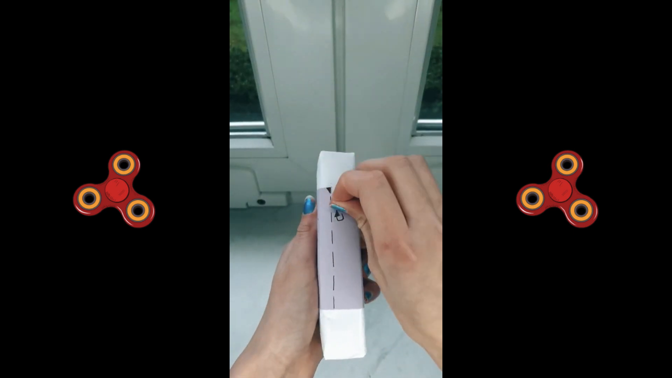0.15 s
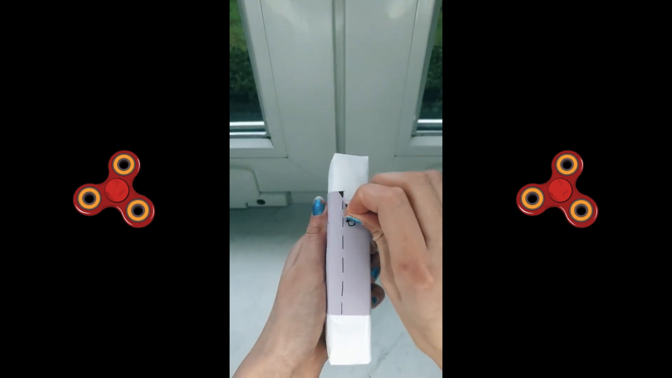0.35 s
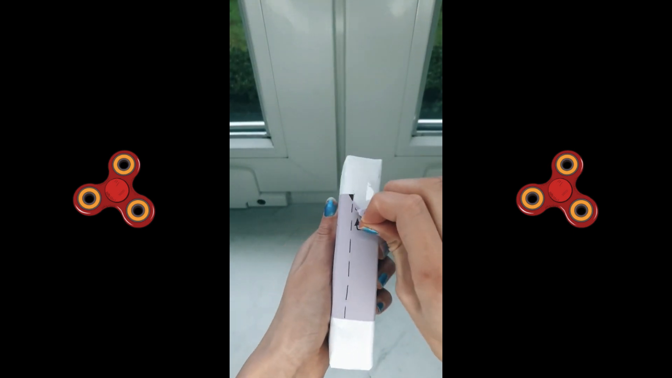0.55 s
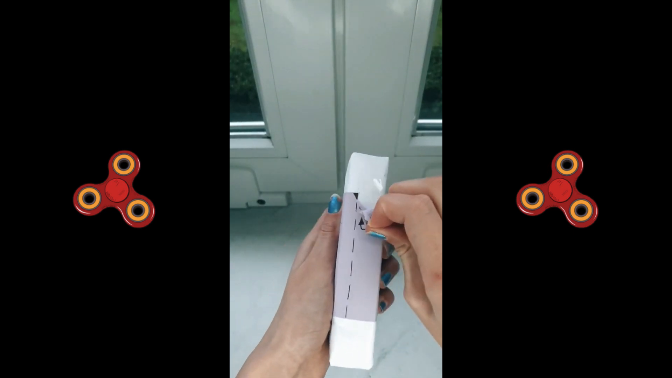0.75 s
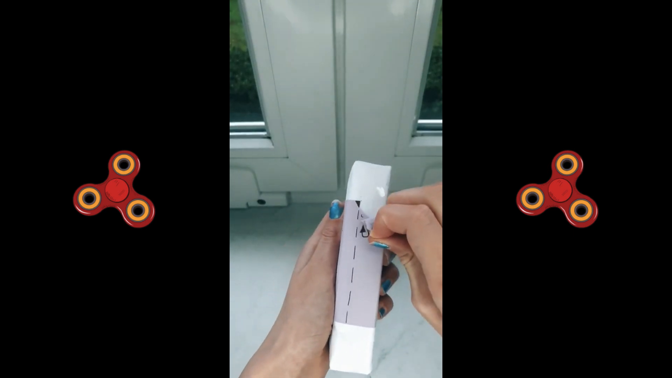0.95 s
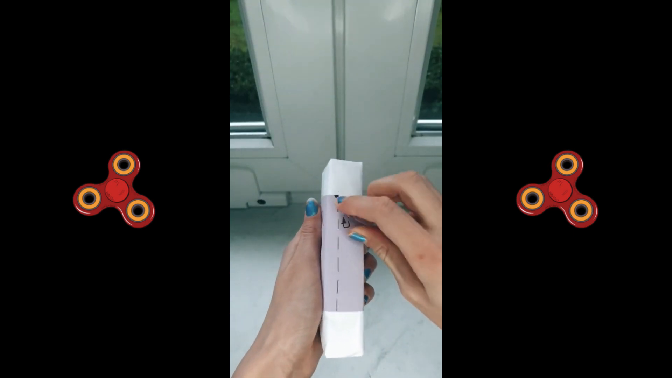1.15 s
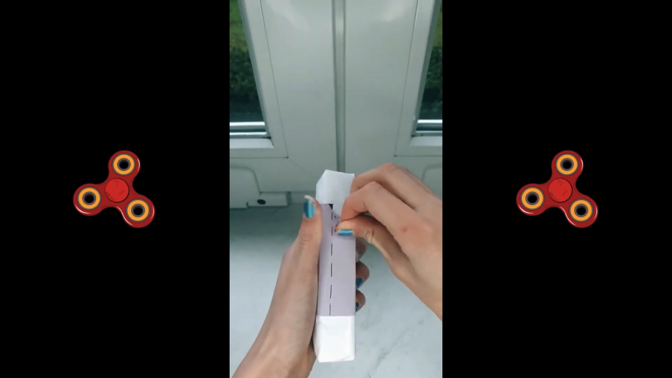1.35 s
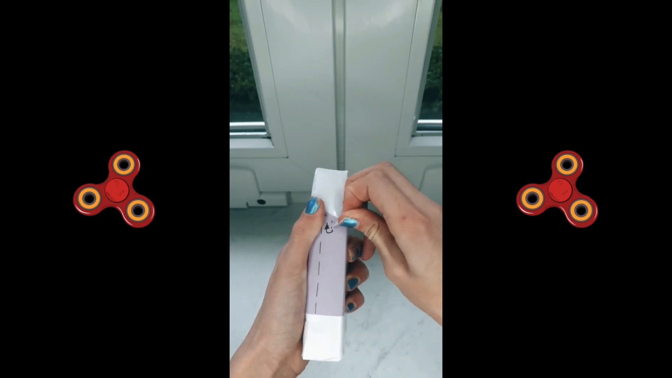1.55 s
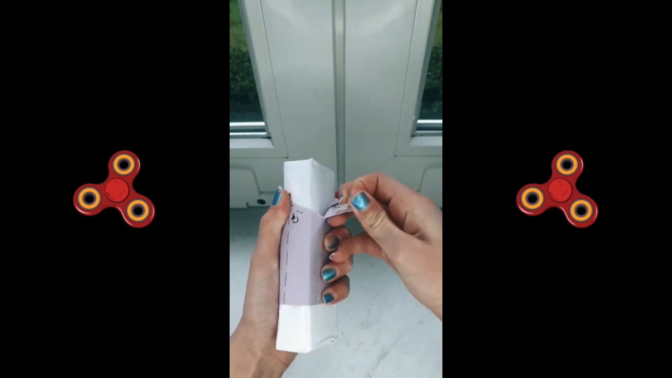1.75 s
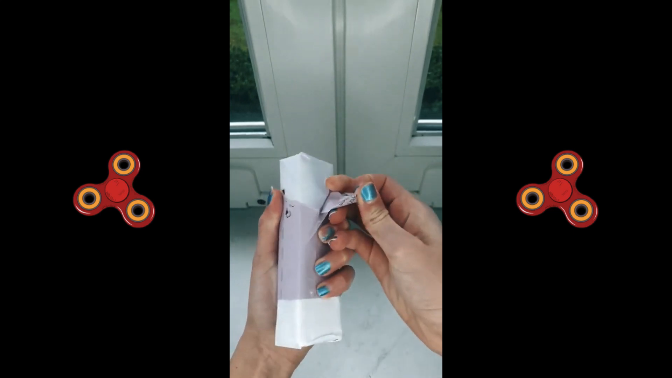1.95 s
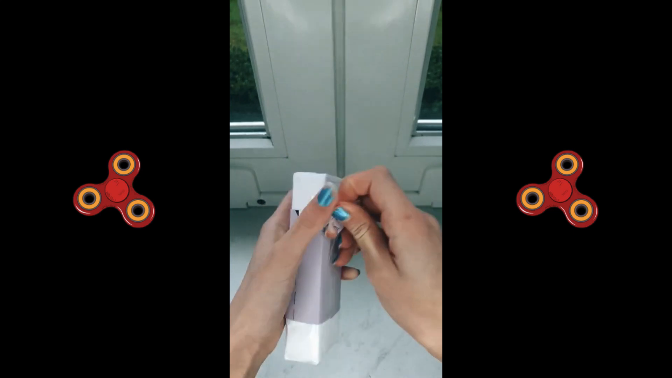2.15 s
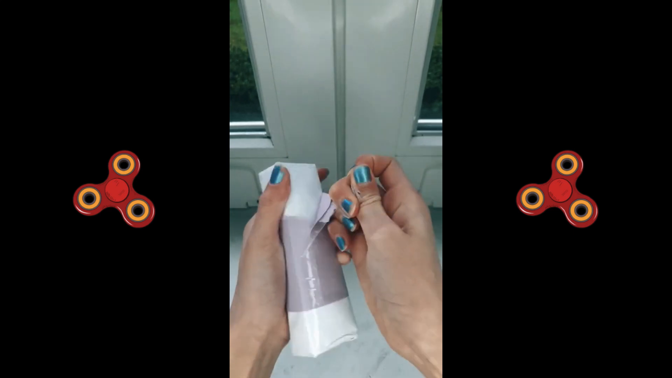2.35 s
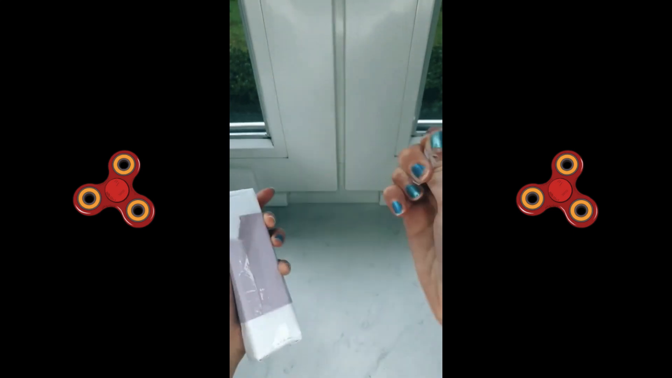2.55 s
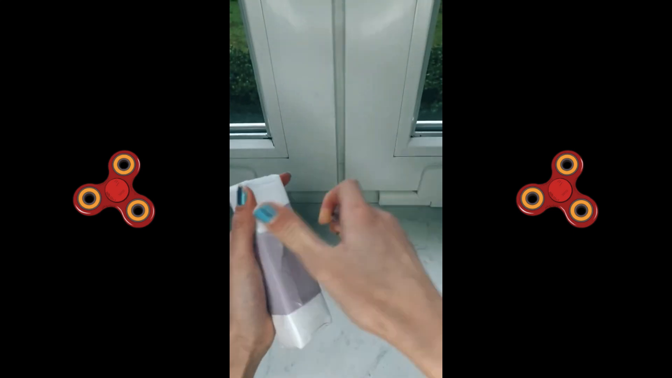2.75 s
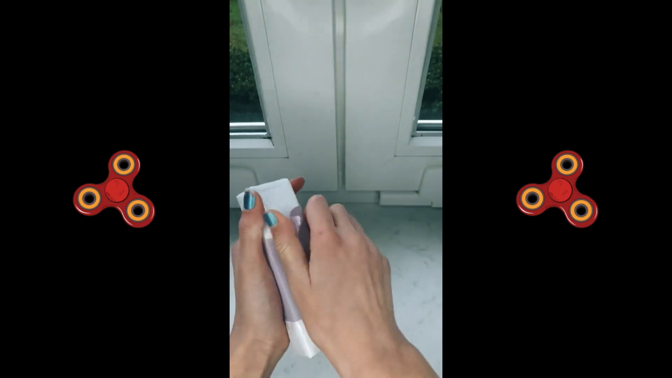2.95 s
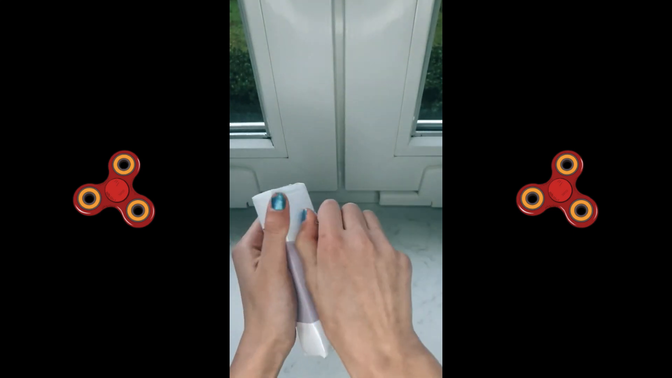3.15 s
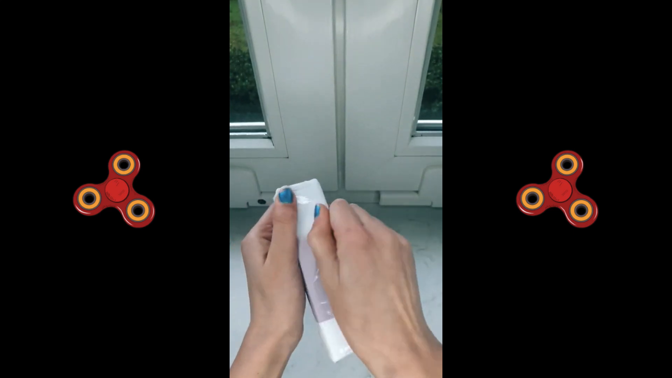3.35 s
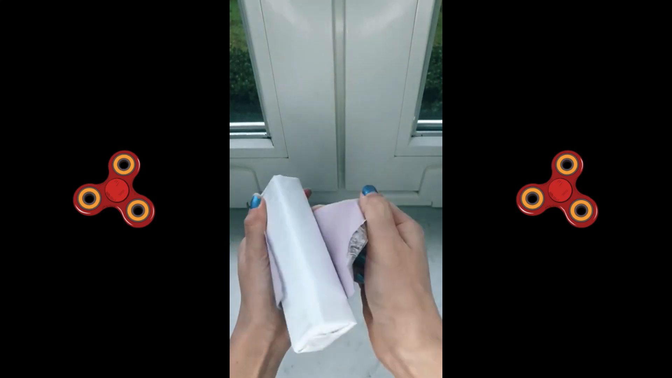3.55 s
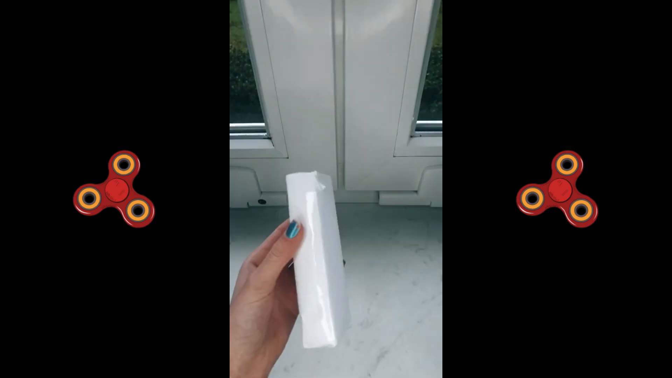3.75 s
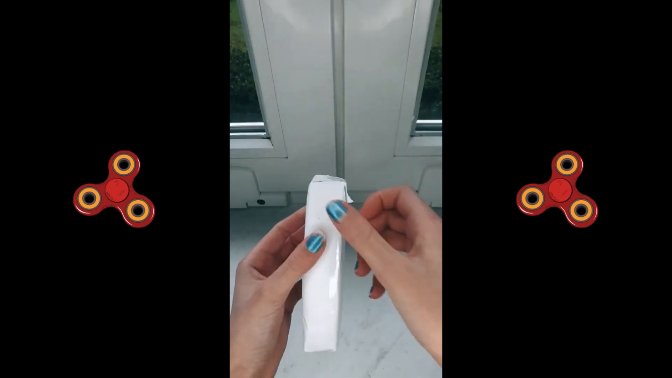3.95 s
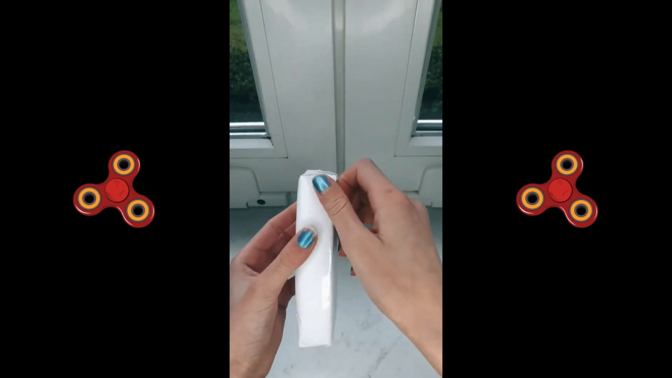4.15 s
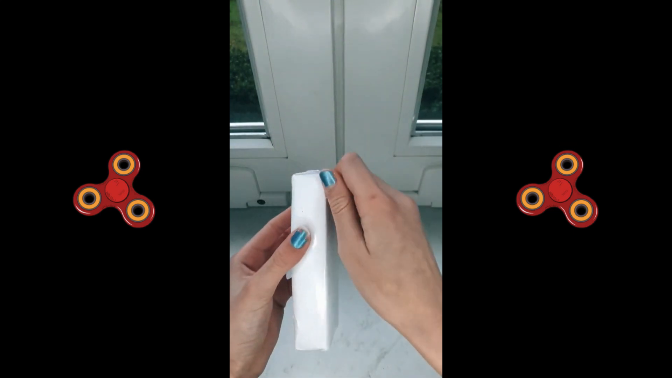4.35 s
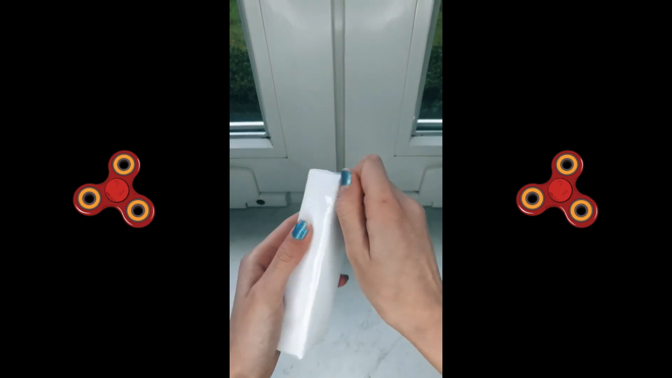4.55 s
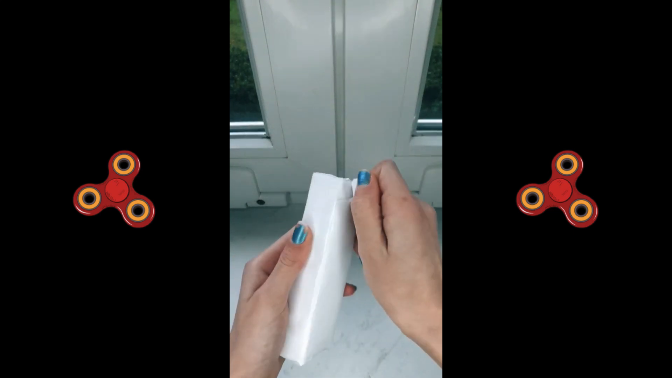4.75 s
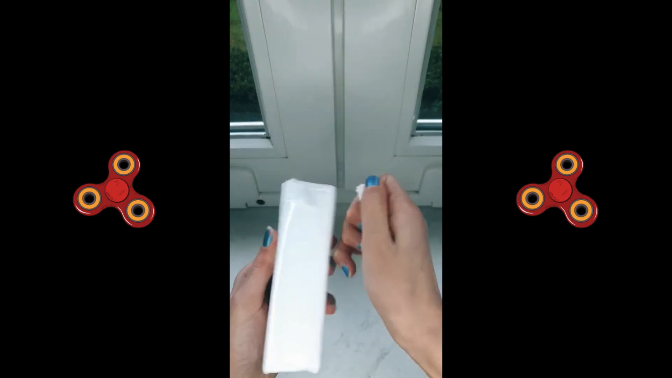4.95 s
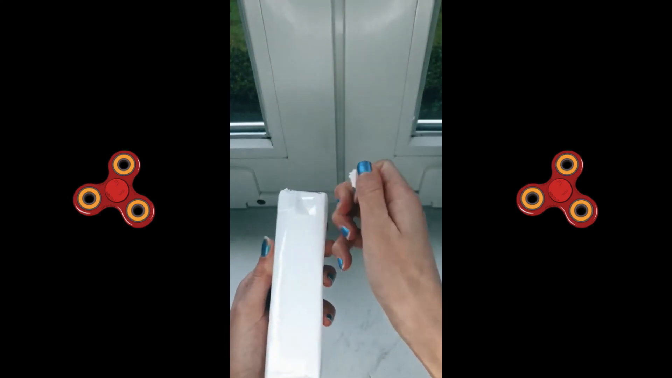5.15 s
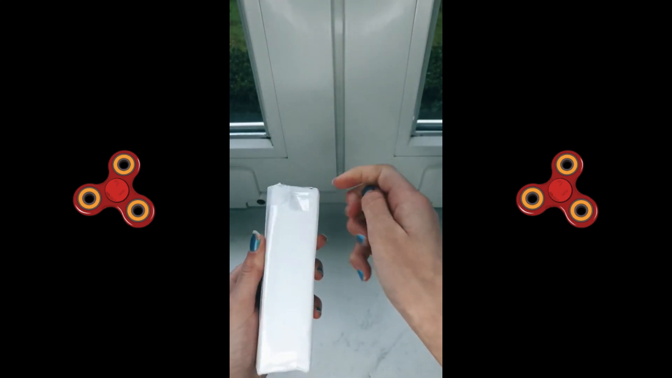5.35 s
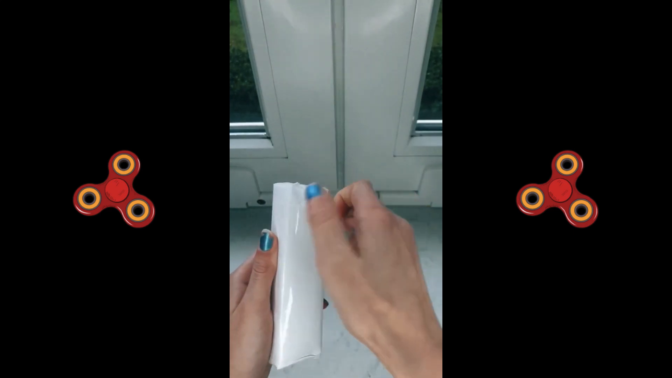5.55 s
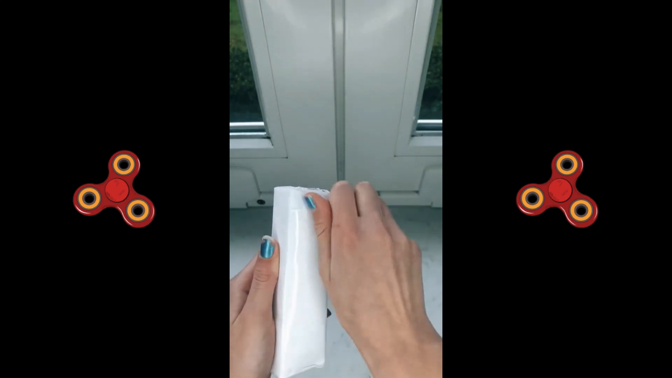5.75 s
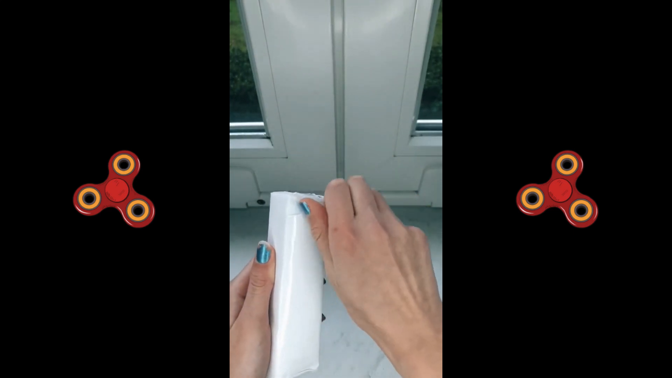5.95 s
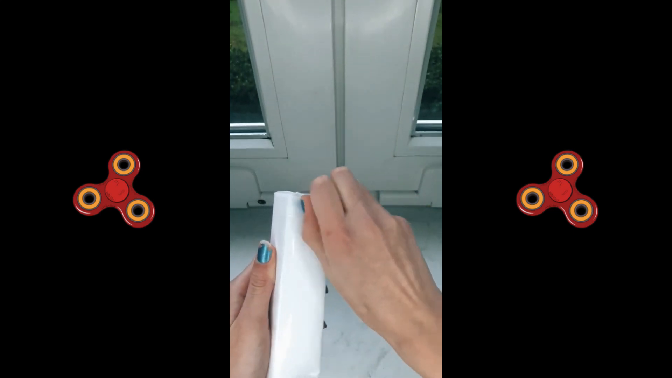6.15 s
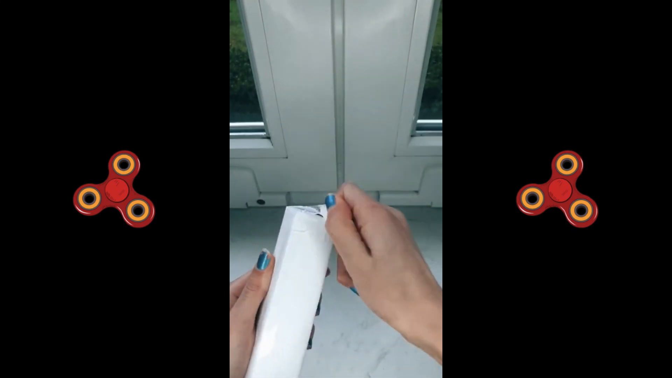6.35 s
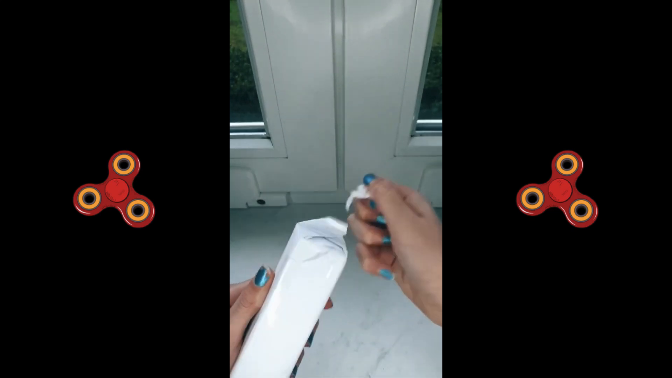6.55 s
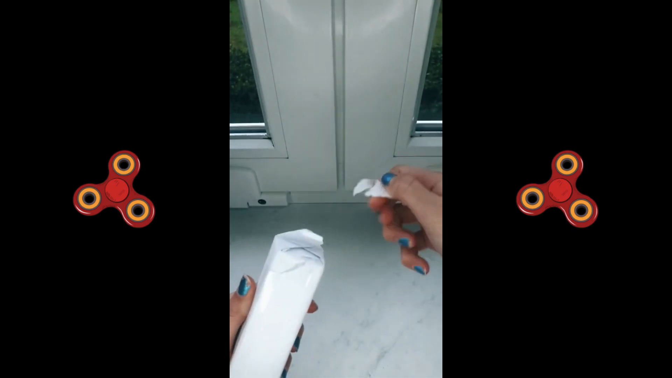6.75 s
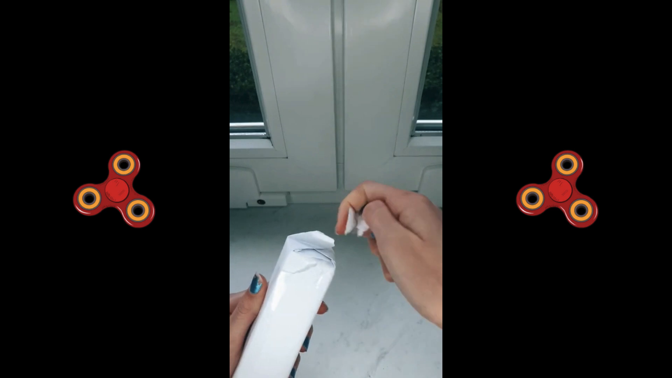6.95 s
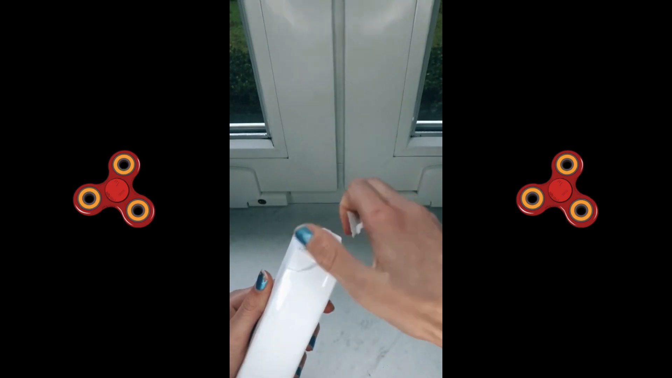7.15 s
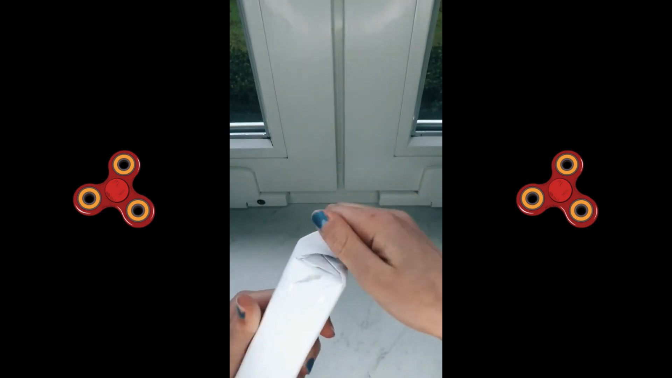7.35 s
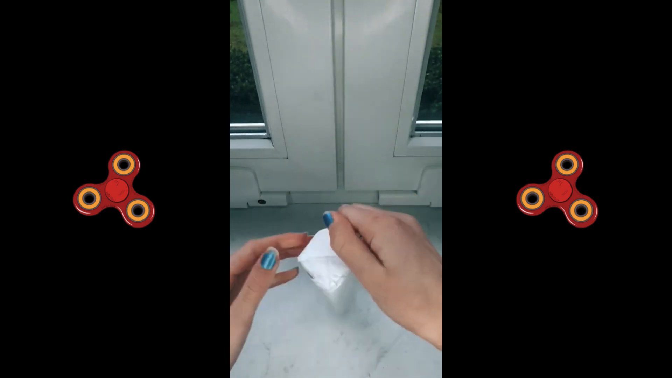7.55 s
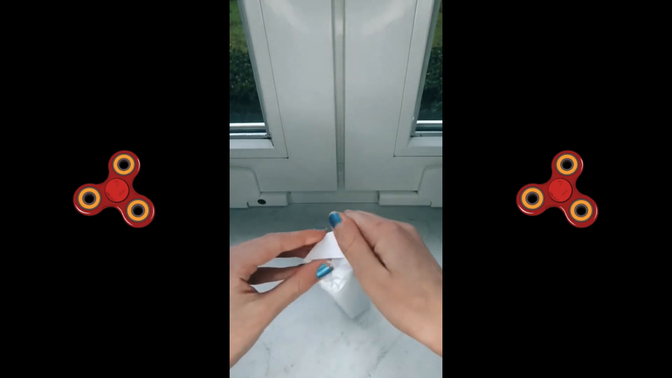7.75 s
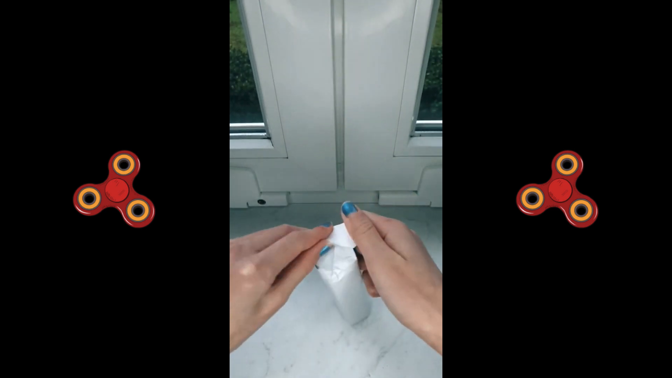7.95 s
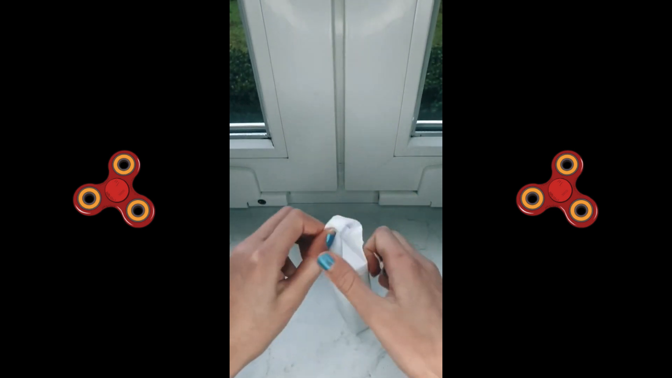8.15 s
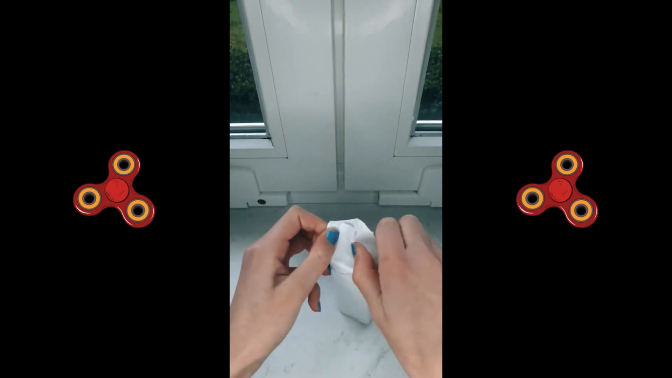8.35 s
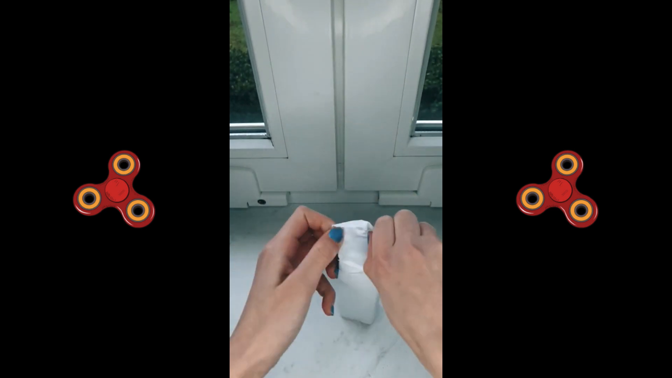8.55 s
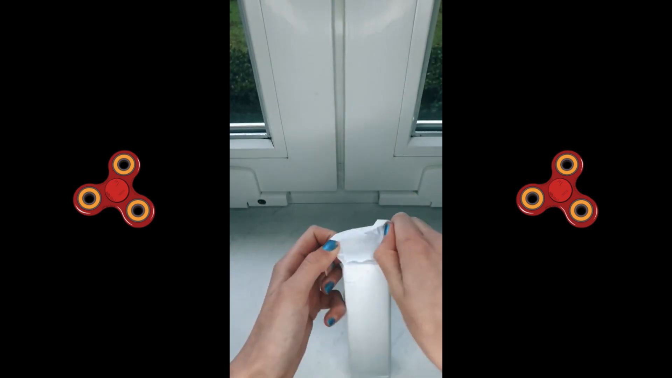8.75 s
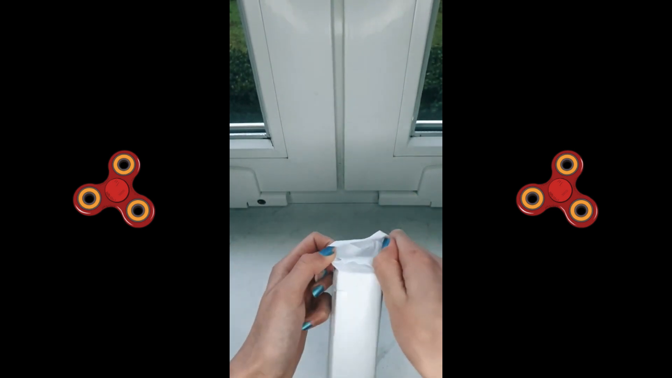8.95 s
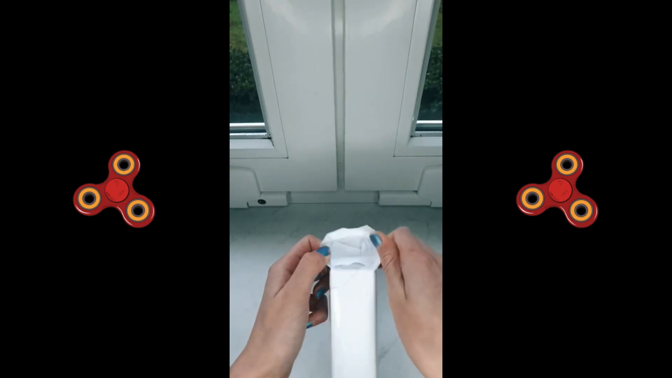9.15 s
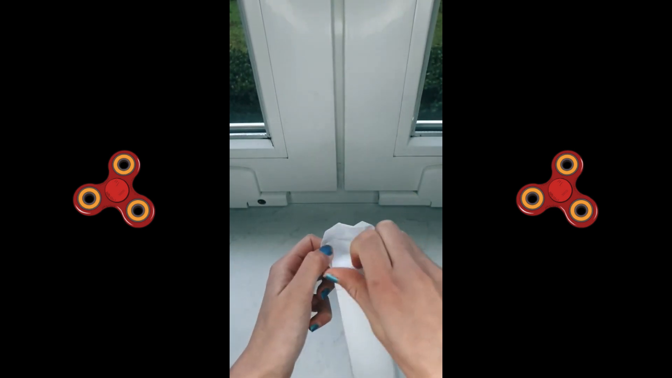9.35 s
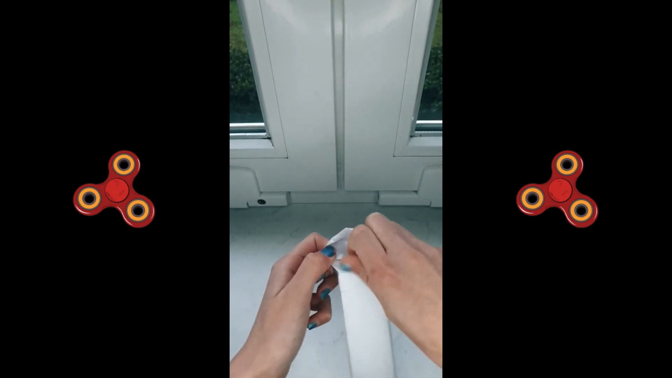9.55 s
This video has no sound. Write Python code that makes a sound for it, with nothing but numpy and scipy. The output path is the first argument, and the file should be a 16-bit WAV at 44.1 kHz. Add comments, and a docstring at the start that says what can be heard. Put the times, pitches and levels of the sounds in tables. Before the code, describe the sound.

In a small room, close to a stereo microphone, fingers work at a slim carton's paper wrapper. From 0 to 1.2 s there are only faint picks, bright ticks and light rubs, with a low bump near 1.1. Tearing grows at 1.4-1.8, then rips to a hard crack with a hollow thump around 2.3. Quiet rustling follows until 2.9; crisp snaps and strong ripping come at 3.1-3.5. The sound fades almost out at about 3.65-3.85 and returns with more low rumble and wavering hum. Faint crinkles lead to sharp snaps at 4.55 and 4.86. Sparse rustles and a dull tap near 5.65 precede a rising tear at 6.1-6.45, ending in loud cracks and thumps. Softer handling follows, with snaps near 7.1-7.3, then busier crumpling from 7.7, loud cracks at 8.35 and 8.45, and final rips at 9.3-9.5. Soft hiss underneath.

```python
"""In a small room, hands tear and crinkle the paper wrapper of a small carton, close to a stereo microphone.
Fibres break in swarms of tiny clicks, made of noise; creases and glue snap in short ragged bursts.
Both are shaped by the colour of paper and make the carton ring; thumps sound in its hollow.
A low rumble with a wavering hum and some hiss lie underneath. The sound is faded out and in once."""
import sys
import numpy as np
from scipy import signal
from scipy.fft import rfft, irfft, next_fast_len
from scipy.io import wavfile
from scipy.ndimage import uniform_filter1d

SR = 44100
rng = np.random.default_rng(int(sys.argv[2]) if len(sys.argv) > 2 else 0)


def transcribe(signal):
    """Save signal, clipped to [-1, 1], as a 16-bit WAV file at the path in sys.argv[1]."""
    frames = np.atleast_2d(signal).T
    limited = np.clip(frames, -1, 1)
    pcm = np.round(limited * 32767).astype(np.int16)
    wavfile.write(sys.argv[1], SR, pcm)


def field_ratio(decibels):
    """Amplitude ratio for a level in dB (20 dB per decade); scalars and array-likes work."""
    return 10 ** (np.asarray(decibels, dtype=float) / 20)


N = 422919
T = np.arange(N) / SR  # time in seconds


def unit(x):
    """Scale to rms 1."""
    return x / np.sqrt(np.mean(x ** 2))


def curve(rows):
    """Columns of a table, joined by straight lines in time."""
    s, *columns = np.transpose(rows)
    return [np.interp(T, s, column) for column in columns]


def colour(points, size=2048):
    """Filter with the given (Hz, dB) shape that answers without delay (minimum phase), energy 1."""
    hz, db = np.transpose(points)
    bins = np.arange(size // 2 + 1) * SR / size
    gain_db = np.interp(np.log(bins + 1), np.log(hz), np.maximum(db, -60))
    cepstrum = irfft(np.log(field_ratio(gain_db)))
    # folding the cepstrum puts the whole response after time zero
    cepstrum[1:size // 2] *= 2
    cepstrum[size // 2 + 1:] = 0
    h = irfft(np.exp(rfft(cepstrum)))
    return h / np.sqrt(np.sum(h ** 2))


def ring(modes, size=2048):
    """Dying tones of a struck body, from (Hz, width Hz, dB) rows with alternating sign, energy 1."""
    t = np.arange(size) / SR
    h = np.zeros(size)
    for k, (hz, width, db) in enumerate(modes):
        decay = np.exp(-np.pi * width * t)
        h += (-1) ** k * field_ratio(db) * np.sqrt(width) * decay * np.sin(2 * np.pi * hz * t)
    return h / np.sqrt(np.sum(h ** 2))


def through(x, h):
    """Send a sound through a filter response."""
    return signal.fftconvolve(x, np.atleast_2d(h), axes=-1)[:, :N]


def walk(rate):
    """Slow random wander: levels held 1 / rate seconds and smoothed twice; spread near 1."""
    k = int(SR / rate)
    steps = np.repeat(rng.standard_normal(N // k + 1), k)
    return 1.3 * uniform_filter1d(uniform_filter1d(steps, k), k)[:N]


def pair(alike, draw):
    """Two channels of a noise that are alike by a share 0-1."""
    alike = np.clip(alike, 0, 1)
    common = np.sqrt((1 + alike) / 2) * draw()
    opposite = np.sqrt((1 - alike) / 2) * draw() * np.array([[1], [-1]])
    return common + opposite


def sides(pan_db):
    """Left and right gain from the left minus right level in dB."""
    return field_ratio(np.array([pan_db, -pan_db]) / 2)


def background():
    """Rumble and hum waver nearly alike on both sides; the microphones hiss apart."""
    # Each row: time in seconds, rumble level in dB, hum level in dB
    background_levels = [(0, -72, -88), (1.03, -76, -83), (1.09, -56, -65), (1.3, -73, -80),
                         (2.3, -72, -84), (2.37, -64, -62.5), (2.62, -79, -95.5), (3.46, -68.5, -68),
                         (3.62, -74, -82.5), (3.86, -60, -58), (4.05, -59, -58), (4.34, -58.5, -59.5),
                         (4.55, -59, -77), (4.9, -57, -59.5), (5.1, -64.5, -70), (5.35, -65, -67.5),
                         (5.5, -68, -59), (5.78, -62.5, -63.5), (6.1, -67.5, -77.5), (6.8, -72.5, -87.5),
                         (9.59, -73, -91.5)]
    # Colour of the rumble. Each row: frequency in Hz, level in dB
    rumble_colour = [(15, -33), (25, -24), (60, 5.5), (156, -2), (210, -10), (297, -12.5), (372, -32.5),
                     (458, -14), (900, -39.5), (1170, -61.5), (1980, -120)]
    # Tones of the hum. Each row: frequency in Hz, level in dB
    hum_tones = [(153.5, 0), (232, -19), (325, -22.5), (462, -19.5), (605, -25.5)]
    # Colour of the hiss. Each row: frequency in Hz, level in dB
    hiss_colour = [(120, -31), (200, -5.5), (683, -5.5), (1400, -17.5), (7830, -9), (9750, -19.5),
                   (12600, -8), (16000, -20.5)]
    hiss_db = -75

    def noise():
        return rng.standard_normal(N)

    rumble_db, hum_db = curve(background_levels)
    rumble = through(pair(0.96, noise), colour(rumble_colour, size=8192))
    rumble = rumble * field_ratio(rumble_db + 1.5 * walk(10))
    hum = np.zeros(N)
    for hz, db in hum_tones:
        # each tone drifts a little in strength and pitch
        strength = field_ratio(db + 2.7 * walk(7.5))
        pitch = hz * (1 + 0.008 * walk(7.3))
        hum += strength * np.sin(2 * np.pi * np.cumsum(pitch) / SR)
    hiss = field_ratio(hiss_db) * through(pair(0.05, noise), colour(hiss_colour))
    return rumble + np.sqrt(2) * hum * field_ratio(hum_db) + hiss


def fibres(alike, spread_db, slips_per_s, slip_db, slip_ms):
    """Fibres break as faint clicks; now and then a slip sets off a swarm that starts at once and dies away."""
    slips = (rng.random(N) < slips_per_s / SR) * field_ratio(slip_db * rng.random(N))
    swarms = 1 + signal.lfilter([1], [1, -np.exp(-1000 / (slip_ms * SR))], slips)

    def clicks():
        return rng.standard_normal(N) * field_ratio(spread_db * rng.exponential(size=N))

    return unit(swarms * pair(alike, clicks))


def strokes():
    """Each stroke sets in fast, swells or sags while it lasts and dies away; gains of sheet and carton face."""
    # Pulls and rubs of the fingers. Each row: start in seconds, length in seconds, sheet level at the start
    # in dB, sheet level at the end in dB, carton face level relative to the sheet in dB
    stroke_rows = [(.062, 0.0178, -55, -41, -7), (0.193, 0.137, -70, -65.5, -12),
                   (0.391, 0.052, -65, -51, -14), (0.444, 0.17, -64, -68, -12),
                   (0.711, 0.21, -66.5, -86, -10.5), (0.954, 0.025, -70.5, -61.5, 3),
                   (1.059, 0.16, -64, -51, -7), (1.278, 0.028, -58, -59, -7), (1.358, 0.2, -55, -35.5, -7),
                   (1.542, 0.12, -39.5, -60.5, -8), (1.676, .2, -47, -52, -14),
                   (1.894, 0.067, -56.5, -56, -11), (1.928, 0.073, -52.5, -49, -2),
                   (2.032, .16, -59.5, -60, -12.5), (2.201, 0.076, -61, -31, -15.5),
                   (2.344, 0.024, -33, -42.5, -5), (2.514, 0.098, -71, -58.5, -24),
                   (2.634, 0.15, -74.5, -84, -19), (2.754, 0.24, -59, -59, -11.5),
                   (3.018, 0.071, -64.5, -51.5, -12), (3.14, 0.024, -53, -52, -1.5),
                   (3.201, .02, -44, -54, 6), (3.234, .17, -50, -38, -12),
                   (3.417, 0.076, -29.5, -35.5, -9.5), (3.55, .085, -47, -55, -8.5),
                   (3.876, 0.23, -89.5, -74, -6), (4.126, 0.08, -62.5, -63.5, -9.5),
                   (4.241, .12, -73.5, -63.5, -5), (4.37, .09, -70, -68, -12),
                   (4.468, 0.066, -56, -74, -18), (4.547, 0.033, -43, -50, -13.5),
                   (4.634, 0.13, -67.5, -50.5, -19), (4.762, 0.018, -40, -28.5, -9),
                   (4.819, 0.019, -55.5, -38, -17), (4.863, 0.027, -36, -40, -7),
                   (4.942, 0.064, -70, -73, -5.5), (5.075, 0.069, -80, -67.5, -16.5),
                   (5.243, .2, -71.5, -87.5, -12.5), (5.515, 0.19, -63, -50, -6.5),
                   (5.775, 0.182, -71.5, -60.5, -11.5), (6.018, 0.035, -63, -55, -19),
                   (6.079, 0.29, -40.5, -51.5, -17), (6.357, 0.07, -33.5, -27.5, -17.5),
                   (6.6, 0.11, -80, -59, -20), (6.716, 0.215, -69, -67.5, -12),
                   (7.067, .025, -71.5, -76.5, -16), (7.097, .03, -57.5, -42, -14.5),
                   (7.185, 0.11, -62, -60, -15), (7.247, 0.02, -62.5, -55.5, -4),
                   (7.286, 0.023, -53.5, -56.5, 3.5), (7.307, 0.16, -55.5, -78.5, -8.5),
                   (7.521, 0.18, -68.5, -68.5, -13.5), (7.74, 0.103, -51.5, -57.5, -15),
                   (7.846, .06, -56.5, -45, -12.5), (7.912, 0.117, -47.5, -61, -10),
                   (8.026, .085, -54, -49.5, -12), (8.152, .13, -59, -59, -10),
                   (8.296, 0.024, -64.5, -53, -15), (8.342, 0.012, -39, -43.5, -12.5),
                   (8.413, 0.059, -58, -62, -4.5), (8.453, 0.029, -39.5, -44.5, -16),
                   (8.501, 0.068, -44, -36.5, -17.5), (8.598, 0.105, -52, -46, -11),
                   (8.784, 0.28, -63, -51.5, -12), (8.975, 0.15, -43.5, -60.5, -16.5),
                   (9.237, 0.034, -53.5, -44, -10), (9.29, .06, -43.5, -61.5, -12),
                   (9.369, 0.1, -62, -47.5, -12.5), (9.461, 0.11, -53.5, -36.5, -21)]
    attack_db_per_s, release_db_per_s = 2998.5, 549.5
    power = np.zeros((2, N))
    for s, length_s, start_db, end_db, face_db in stroke_rows:
        near = slice(max(int((s - 0.05) * SR), 0), int((s + length_s + 0.3) * SR))
        t = T[near] - s
        db = np.interp(t, [0, max(length_s, 0.005)], [start_db, end_db])
        db += attack_db_per_s * np.minimum(t, 0)
        db -= release_db_per_s * np.maximum(t - length_s, 0)
        power[:, near] += field_ratio(db + np.array([[0], [face_db]])) ** 2
    return np.sqrt(power)


def slip_run(decay_ms):
    """A crease lets go in a ragged run of slips that dies within milliseconds."""
    mid, side, slips = rng.standard_normal((3, 1024))
    t_ms = np.arange(1024) / SR * 1000
    ragged = field_ratio(np.repeat(slips[:32], 32))  # a new level every 32 samples
    run = (mid + 0.12 * side * np.array([[1], [-1]])) * ragged
    run[:, 8] += 5  # the first break is one clean crack
    fall = np.exp(-t_ms / max(decay_ms, 0.2)) * np.minimum(t_ms / 0.18, 1)
    run = run * fall
    # every run gets the energy of its smooth outline
    return run * np.sqrt(np.sum(fall ** 2) / np.mean(np.sum(run ** 2, axis=1)))


def add_snaps(sheet, fine, face, hollow, crest_db):
    """Creases and glue let go: each snap drives the sheet, fibres and carton, and its creased patch rings."""
    # Each row: time in seconds, peak level in dB, fine fibres relative to the peak in dB,
    # carton face relative to the peak in dB, ring of the creased patch in Hz
    snap_rows = [(0.0653, -37, -3, -12, 7200), (0.1969, -44.5, -6.5, -24, 7160),
                 (0.3003, -53, -8, -20, 6280), (0.3215, -35, -12, -19.5, 7750),
                 (0.3832, -42, -5.5, -24, 6860), (0.4229, -39, -6, -23, 6900), (0.461, -48, 3, -20, 6100),
                 (0.5336, -47, -0.5, -30, 7300), (0.5818, -49, -2, -20, 5300), (0.7469, -47, -4, -33, 6270),
                 (0.8275, -50.5, 0, -22, 7650), (0.951, -53.5, -12, -12, 7700),
                 (0.9688, -39, -29, -17, 2060), (1.07, -38.5, -15, -11.5, 5740),
                 (1.276, -37, -12, -9.5, 5900), (1.3608, -36, -19.5, -2, 2170),
                 (1.3938, -32.5, -14, -30, 4640), (1.5236, -25.5, -11, -7, 5640),
                 (1.5537, -26.5, -7, -7, 6310), (1.6759, -31.5, -13, -19, 5900),
                 (1.7826, -33.5, -11.5, -14, 5590), (1.8282, -36.5, -27, -33, 3440),
                 (1.9872, -33.5, -15.5, -3, 2470), (2.1458, -35.5, -16, -13, 3860),
                 (2.1923, -41, -10, -10, 2450), (2.2097, -33.5, -8, -17, 5860),
                 (2.2472, -27, -8, -22, 3800), (2.2633, -17, -12, -17, 5470),
                 (2.3453, -9, -19.5, -13, 5100), (2.5277, -49.5, -18.5, -28, 7400),
                 (2.5651, -44, -8.5, -37, 7330), (2.746, -51.5, -30, -4, 7290),
                 (2.8644, -36, -4.5, -31, 7400), (2.9403, -31, -3, -19, 6340),
                 (2.9681, -28, -23, -21.5, 2470), (3.05, -42, -11, -2, 2440),
                 (3.0626, -37.5, -13, -19, 2470), (3.078, -32, -10, -12.5, 7080),
                 (3.1447, -30.5, -14, -14, 2300), (3.1553, -20, -20, -27, 5040),
                 (3.2004, -14, -19.5, -14.5, 3460), (3.2973, -31.5, -11, -11, 4900),
                 (3.3222, -25.5, -12, -16, 4900), (3.4299, -9.5, -15, -9, 6000),
                 (3.484, -21.5, -19.5, -4, 2340), (3.9265, -53, -17.5, -7.5, 1980),
                 (3.9738, -49.5, -20, -19, 5500), (4.1452, -51, -10.5, 5.5, 6940),
                 (4.4687, -39, -8.5, -34, 6160), (4.5499, -21, -14.5, -39, 6160),
                 (4.6626, -43, -5.5, -36, 5500), (4.7343, -40, 1.5, -12, 4660),
                 (4.7702, -27, -6, -26, 6390), (4.8612, -13.5, -6.5, -15, 8250),
                 (4.9758, -41, -32, 0.5, 2050), (5.252, -51, -2, -26, 6550), (5.5117, -44, -22, -22, 5900),
                 (5.5714, -42.5, 0, -31, 6200), (5.688, -23, -39, -16, 2650),
                 (5.8549, -43, -1.5, -26, 5900), (6.0306, -50, 3, -32, 5670),
                 (6.0776, -35, -6.5, -30, 5630), (6.1375, -30.5, -1.5, -17.5, 5600),
                 (6.25, -30.5, -16, -21, 3420), (6.3604, -18.5, -18, -23, 4700),
                 (6.3835, -15.5, -9.5, -17.5, 7970), (6.6785, -44.5, 1.5, -26, 7660),
                 (6.9138, -50.5, 3, -40.5, 7770), (7.1041, -35, -19, -37, 7780),
                 (7.1194, -25.5, -10, -40, 5650), (7.256, -26.5, -30, -10, 2360),
                 (7.2861, -61, -21.5, 17, 2170), (7.3135, -35.5, -30.5, -9, 2320),
                 (7.7432, -34, -13, -21, 5530), (7.868, -38, -21, -26, 6380), (7.895, -36, -18, -30, 4180),
                 (7.9467, -36.5, -24, -27, 5560), (8.108, -28.5, -11.5, -21, 4870),
                 (8.1965, -38.5, -23, -15, 2490), (8.305, -41, -18, -15, 3950),
                 (8.3305, -25.5, -14.5, -14.5, 5740), (8.3399, -17.5, -22.5, -36, 4460),
                 (8.4571, -13.5, -15, -13, 2540), (8.6388, -29, -18, -10.5, 2370),
                 (8.729, -35.5, -30, -17, 3050), (8.976, -26, -20, -23, 2660),
                 (9.0968, -33, -21, -13.5, 2260), (9.2497, -35, -28, -13, 2400),
                 (9.3089, -19, -41, -20.5, 2400), (9.4444, -15, -5, -20, 6600),
                 (9.5179, -28, -13.5, -27, 2440)]
    decay_ms, decay_ms_per_db = 4.19, 0.02  # decay at -39 dB; harder snaps last a little longer
    hollow_db = -13  # relative to the face
    patch_q, patch_db = 4.5, -8  # sharpness and level of the ringing patch
    for s, db, fine_db, face_db, hz in snap_rows:
        run = field_ratio(db) * slip_run(decay_ms + decay_ms_per_db * (db + 39))
        length = run.shape[1]
        span = slice(int(s * SR), int(s * SR) + length)
        fine[:, span] += field_ratio(fine_db) * run
        face[:, span] += field_ratio(face_db) * run
        hollow[:, span] += field_ratio(face_db + hollow_db) * run
        patch = through(run, ring([(hz, hz / patch_q, 0)], size=256))[:, :length]
        sheet[:, span] += field_ratio(-crest_db) * (run + field_ratio(patch_db) * patch)


def add_knocks(face, hollow, crest_db):
    """Fingers and creases thump the hollow of the carton, and its face a little less."""
    # Each row: time in seconds, peak level in dB
    knock_rows = [(1.07, -33.5), (1.361, -29), (2.146, -40.5), (2.263, -33), (2.345, -17.5), (2.745, -43.5),
                  (3.05, -45), (3.076, -35), (3.145, -32), (3.2, -26), (3.43, -21), (4.86, -31.5),
                  (5.623, -30.5), (6.171, -34.5), (6.359, -37), (6.38, -17.5), (6.428, -25), (7.255, -47.5),
                  (7.66, -46), (7.821, -42), (7.974, -37.5), (8.108, -44), (8.196, -44.5), (8.339, -45),
                  (8.455, -43), (8.585, -28), (8.636, -28), (9.25, -41.5), (9.443, -30)]
    face_db = -5  # relative to the hollow
    for s, db in knock_rows:
        run = field_ratio(db - crest_db) * slip_run(decay_ms=3.0)
        span = slice(int(s * SR), int(s * SR) + run.shape[1])
        hollow[:, span] += run
        face[:, span] += field_ratio(face_db) * run


def bending(x, patch_db, side_db):
    """The sheet bends in the hand: sound shifts between thirds of an octave, and each points its own way."""
    size = next_fast_len(N)
    spectrum, hz = rfft(x, size), np.linspace(0, SR / 2, size // 2 + 1)
    place = 3 * np.log2(np.clip(hz, 800, 16000) / 800)  # thirds of an octave above 800 Hz
    patches = field_ratio(patch_db * np.array([walk(9) + walk(45) for _ in range(14)]))
    # the colour moves, the loudness stays
    patches = patches / np.sqrt(uniform_filter1d(patches ** 2, size=5, axis=0))
    bent = np.zeros((2, N))
    for k, patch in enumerate(patches):
        band = irfft(spectrum * np.clip(1 - abs(place - k), 0, 1))[:, :N]
        bent += band * patch * sides(side_db * walk(31))
    return bent


def paper():
    """Crackle and snaps drive the sheet, its finest fibres, a loose flap, and the face and hollow of the carton."""
    # Colour of the rustle. Each row: time in seconds, fine fibres relative to the sheet in dB,
    # carton hollow relative to the face in dB, flap relative to the sheet in dB
    rustle_tone = [(0, -1, -9, -15), (.9, 3, -26, -6), (1.1, -5, -5, -18), (1.75, -1, -13.5, -18),
                   (2.0, -2.5, 0, -18), (2.45, -7.5, 2.5, -15), (2.9, -3, -0.5, -13), (3.3, -6, 3, -15.5),
                   (3.6, -8.5, -6, -20), (4.15, -0.5, -0.5, -15), (4.45, -4, -3.5, -15),
                   (4.8, 3, -11.5, -10.5), (5.0, -6.5, 15, -17), (5.3, 12.5, 4, -27), (5.7, -5, -7.5, -8),
                   (6.2, 0.5, -7.5, -16.5), (6.9, 5, -6, -11.5), (7.3, -7, 1, -18), (7.9, -6.5, -2.5, -17),
                   (8.4, -6, -5, -21), (8.7, -5.5, -4, -20), (9.0, -5.5, -6.5, -9), (9.59, -9, 1, -5.5)]
    # Where the hands work. Each row: time in seconds, left minus right level in dB
    hand_place = [(0, -2), (.69, 5), (1.28, 0), (2.43, -1), (3.8, -1), (5.16, 1.5), (5.9, -1), (6.85, 0),
                  (7.9, -1.5), (9.05, -3), (9.38, 0.5)]
    # Colour of the sheet, then of its finest fibres. Each row: frequency in Hz, level in dB
    sheet_colour = [(880, -40.5), (1500, -9), (1700, -12), (1960, -2), (2300, 0.5), (2920, -3.5),
                    (3530, -2), (4220, -2), (6140, 0.5), (9000, -3), (11700, -41), (19800, -120)]
    fine_colour = [(4120, -46), (7000, -18), (8920, 8.5), (11400, 15.5), (14800, 10.5), (15600, 4.5),
                   (16200, -17.5)]
    # Ringing of the flap, carton face and hollow. Each row: frequency in Hz, width in Hz, level in dB
    flap_modes = [(2300, 280, 0)]
    face_modes = [(1027, 427, -1), (1255, 340, 2.5), (1657, 260, -4.5)]
    hollow_modes = [(156, 39, -15.5), (287, 87, -6), (449, 100, 1.5), (695, 220, 0)]
    crest_db = 10.5  # peak of a snap over its rms

    crackle = fibres(0.46, spread_db=0.5, slips_per_s=130, slip_db=1.5, slip_ms=2.2)
    sheet, face = crackle * strokes()[:, None]
    fine_db, hollow_db, flap_db = curve(rustle_tone)
    fine, hollow, flap = sheet * field_ratio(fine_db), face * field_ratio(hollow_db), sheet * field_ratio(flap_db)
    add_snaps(sheet, fine, face, hollow, crest_db)
    add_knocks(face, hollow, crest_db)

    bright = through(sheet, colour(sheet_colour)) + through(fine, colour(fine_colour))
    bright += through(face, ring(face_modes)) + through(flap, ring(flap_modes))
    # long waves from the hollow reach both microphones more alike
    deep = through(0.35 * hollow.mean(0) + 0.87 * hollow, ring(hollow_modes))
    return sides(curve(hand_place)[0]) * (bending(bright, patch_db=0.9, side_db=5.0) + deep)


def room(x):
    """Near walls answer after a few milliseconds; the treble of the tail dies first."""
    # Each row: frequency in Hz, time in seconds for the tail to fall by 60 dB
    room_decay = [(300, 0.27), (1200, 0.25), (4000, 0.23), (12000, 0.15)]
    room_db = -9
    t = np.arange(SR // 2) / SR
    hz, t60 = np.transpose(room_decay)
    edges = np.r_[60, np.sqrt(hz[1:] * hz[:-1]), 18000]
    tail = np.zeros((2, len(t)))
    for k in range(len(hz)):
        # low bands are more alike on both sides
        noise = pair(600 / hz[k] - 0.2, lambda: rng.standard_normal(len(t)))
        band = signal.butter(2, edges[k:k + 2], "band", fs=SR, output="sos")
        tail += signal.sosfilt(band, noise) * field_ratio(-60 * t / t60[k])
    tail = tail * np.clip((t - 0.002) / 0.0013, 0, 1)
    return field_ratio(room_db) * through(x.mean(0, keepdims=True), tail / np.sqrt(np.sum(tail ** 2) / 2))


def scene():
    """Paper in the room over the background."""
    near = paper()
    return near + room(near) + background()


def band_limit(x):
    """A steep low-pass at the top of the band."""
    return signal.sosfilt(signal.butter(12, 17000, fs=SR, output="sos"), x)


def record(dry):
    """The deepest bass is taken out; the sound is faded out and in once."""
    # Each row: time in seconds, level in dB
    fade_levels = [(3.62, 1.5), (3.655, -25), (3.81, -30), (3.86, -3.5), (3.89, 1)]
    heard = signal.sosfilt(signal.butter(2, 38, "high", fs=SR, output="sos"), dry)
    return band_limit(heard * field_ratio(curve(fade_levels)[0]))


dry = scene()
out = record(dry)
transcribe(out)
```